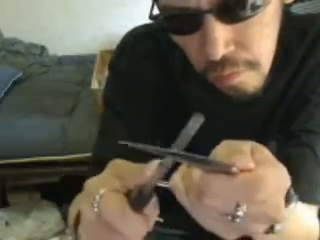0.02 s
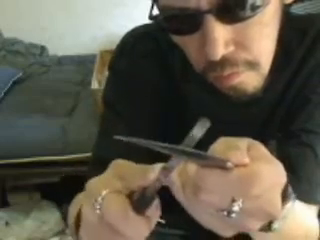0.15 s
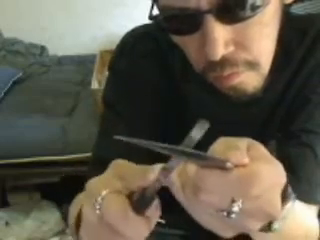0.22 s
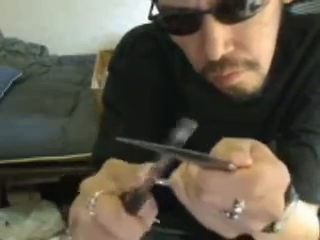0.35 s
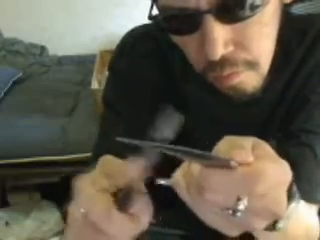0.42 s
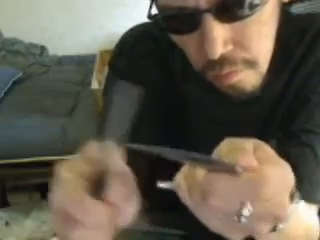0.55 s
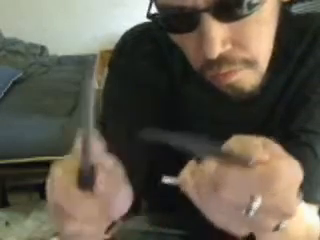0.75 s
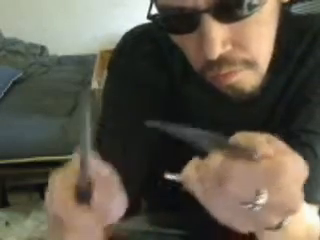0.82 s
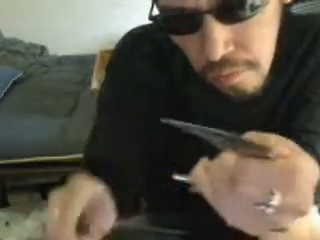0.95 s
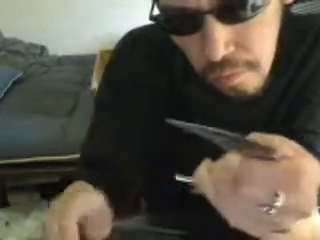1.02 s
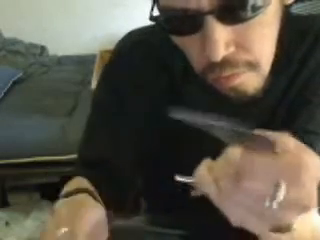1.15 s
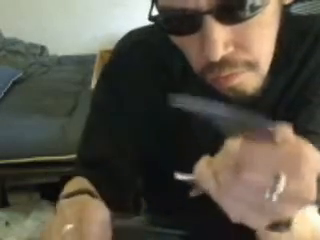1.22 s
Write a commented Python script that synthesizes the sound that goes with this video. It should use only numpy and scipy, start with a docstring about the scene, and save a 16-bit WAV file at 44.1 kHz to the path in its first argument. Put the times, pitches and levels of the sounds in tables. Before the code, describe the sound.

A sharpening steel clicks onto a knife blade and slides along it in one short, bright, ringing scrape that fades, catches and grows louder before ending. Faint hand bumps and a low hum sit beneath it in a small room.

```python
"""A click over faint room hum: a sharpening steel lands on a knife blade, skids, catches, leaves the tip.
Friction rings the steel's modes in turn as the contact slides outward. Two blade bending resonances
fall; the upper one climbs back near the tip. The stroke shakes the hands with low bumps.
Small room, narrow-band microphone."""
import sys
import numpy as np
from scipy import signal
from scipy.fft import rfft, irfft, next_fast_len
from scipy.io import wavfile
from scipy.ndimage import map_coordinates

SR = 44100
rng = np.random.default_rng(int(sys.argv[2]) if len(sys.argv) > 2 else 0)


def digitize_waveform(pressure):
    """Quantize a signal to 16-bit integers and store it at the path in sys.argv[1].

    Rows of a 2-D input are taken as channels; values are limited to [-1, 1].
    """
    field = np.atleast_2d(pressure).T
    bounded = np.clip(field, -1, 1)
    quanta = np.round(bounded * 32767).astype(np.int16)
    wavfile.write(sys.argv[1], SR, quanta)


N = 57330

# (frequency [Hz], width [Hz], struck gain [dB], rubbed gain [dB], most excited at place [0-1],
#  reach [0-1]); place 0 = heel, 1 = tip; reach 0 = struck only
STEEL_MODES = [(1154, 99, -22, -10, 0.67, 0.12), (1342, 200, -2, -12, 0.46, 0.24),
               (2868, 95, -2, -1.5, 0.7, 0.03), (3174, 120, -19, -6.5, .74, 0.2),
               (3610, 280, 3.5, 3.5, 0.9, 0.08), (4066, 210, -4.5, -3.5, .78, .13),
               (4910, 100, -15, 0, 0.5, 0), (5146, 186, 3, 4, .76, 0.07), (5580, 270, -2, -6, .77, 0),
               (6047, 290, 3.5, -0.5, .83, 0.1), (6580, 300, -1.5, -8, .3, 0.6),
               (6600, 140, -26, -6, .95, .2), (6840, 170, -9.5, 0.5, 0.96, .08),
               (7355, 240, -18, -1, 1, 0.08)]
# (time [s], relative level [dB])
FRICTION = [(.205, -100), (.212, -39), (.221, -41), (.235, -39.5), (.252, -51), (.277, -54.5), (.3, -61),
            (.325, -73), (.34, -51), (.349, -44), (.38, -56), (.408, -53), (.428, -44), (.474, -42.5),
            (.483, -33), (.508, -36.5), (.517, -33), (.525, -38.5), (.544, -42), (.574, -37.5),
            (.596, -39.5), (.603, -55), (.635, -67), (.66, -110)]
# (time [s], lower [Hz], upper [Hz], lower gain [dB], upper gain [dB])
BLADE_BENDS = [(.22, 3200, 6200, -6.5, -4.5), (.27, 3570, 5930, 3.5, 0), (.3, 3250, 5900, -9, 1),
               (.335, 3050, 5050, -7, 1.5), (.4, 2950, 4850, -18, 3), (.43, 2960, 5000, -0.5, -8),
               (.485, 2830, 4820, -3.5, -9.5), (.525, 2340, 5400, -12, 0.5), (.57, 2070, 5950, -7.5, -14),
               (.6, 1910, 6000, -18.5, -14)]
# (frequency [Hz], relative density [dB])
RASP_SPECTRUM = [(500, -31), (1000, -25), (1650, -21), (2600, -9.5), (4000, -7), (5600, -3.5), (7000, -9.5),
                 (8200, -11.5)]
# steel-on-steel blows and snags (time [s], relative level [dB])
BLOWS = [(.2179, -6), (0.2209, -16.5), (.3485, -23.5), (.3512, -25.5), (0.4826, -16.5), (.4945, -21.5),
         (.515, -22)]
# (time [s], width [s], level [dB], pitch [Hz])
EDGE_SQUEAKS = [(.349, .004, -43, 1193), (.367, 0.0054, -56, 1270)]
# (time [s], width [s], level [dB], pitch [Hz])
HAND_BUMPS = [(.481, 0.0059, -48, 108), (.508, 0.0084, -46, 124.4), (.819, 0.0041, -49, 152),
              (1.289, 0.011, -57, 132)]
# air shoved by the hands (time [s], width [s], level [dB])
AIR_PUFFS = [(.226, .007, -63), (.497, .013, -51.5), (.6, 0.037, -73.5)]
# (frequency [Hz], relative density [dB])
PUFF_SPECTRUM = [(20, -24), (45, -2), (90, -7), (200, -23.5), (500, -47)]
# (frequency [Hz], relative density [dB])
ROOM_NOISE_SPECTRUM = [(25, -50), (50, -29.5), (85, -17), (120, -5.5), (150, -6.5), (185, 0), (270, -4),
                       (400, -9), (480, -7), (600, -11.5), (950, -12), (1250, -17), (2100, -21),
                       (3000, -28), (4500, -29.5), (7000, -32.5), (8000, -40)]
# (frequency [Hz], level [dB])
HUM_TONES = [(121, -69), (264.5, -64.5), (302, -70), (341, -71.5)]

SLIDE_START_S, SLIDE_END_S = 0.25, 0.598
LOWER_WIDTH_HZ, UPPER_WIDTH_HZ = 560, 790
RASP_HEEL_GAIN_DB, RASP_RISE_DB = -8, 3.5
SLIPS_PER_S, SLIP_SPREAD_DB, CHATTER_DB, CHATTER_PER_S = 8000, 3, 1.4, 250
CONTACT_S, CRUNCH_T60_S = 0.00023, 0.0081
ROOM_T60_S, ROOM_DELAY_S, REVERB_DB, ROOM_NOISE_DB = 0.15, 0.003, -9.5, -58.5


def scrape():
    """Friction drives each mode as the contact passes its place, plus two bends and a broad rasp."""
    friction = amp(curves(FRICTION)[0])
    force = grit() * friction
    place = np.clip((clock() - SLIDE_START_S) / (SLIDE_END_S - SLIDE_START_S), 0, 1)
    ring = sum(resonate(force * amp(db) * bell(place - spot, reach), hz, width_hz)
               for hz, width_hz, _, db, spot, reach in STEEL_MODES if reach > 0)
    lower_hz, upper_hz, lower_db, upper_db = curves(BLADE_BENDS)
    bends = resonate(grit() * friction * amp(lower_db), lower_hz, LOWER_WIDTH_HZ)
    bends += resonate(grit() * friction * amp(upper_db), upper_hz, UPPER_WIDTH_HZ)
    rasp = coloured(grit() * friction * amp(RASP_HEEL_GAIN_DB + RASP_RISE_DB * place), RASP_SPECTRUM)
    return amp(-6.5) * ring + amp(-4) * bends + rasp


def grit():
    """Dense, uneven micro-slips in clumps; rms 1."""
    slips = (rng.random(N) < SLIPS_PER_S / SR) * rng.choice([-1, 1], N)
    size_db = SLIP_SPREAD_DB * rng.standard_normal(N) + CHATTER_DB * wobble(CHATTER_PER_S)
    return unit(slips * amp(size_db))


def clicks():
    """Each blow starts all modes at once, with a short crunch."""
    ring, crunch = np.zeros(N), np.zeros(N)
    for at_s, db in BLOWS:
        age_s = np.maximum(clock() - at_s, 0)
        attack = 1 - np.exp(-age_s / CONTACT_S)
        for k, (hz, width_hz, struck_db, *_) in enumerate(STEEL_MODES):
            gain = (-1) ** k * amp(db + struck_db) * np.sqrt(width_hz / 100)
            decay = np.exp(-np.pi * width_hz * age_s)
            ring += gain * attack * decay * np.sin(2 * np.pi * hz * age_s)
        crunch += amp(db - 60 * age_s / CRUNCH_T60_S) * (age_s > 0)
    return amp(-24.5) * ring + amp(-22) * coloured(crunch * rng.standard_normal(N), RASP_SPECTRUM)


def squeaks():
    """The edge catches: brief, rough, rising tones."""
    return blips(EDGE_SQUEAKS, rise_hz_per_s=23000, flutter_rad=0.26)


def hands():
    """Moving hands: dull bumps and puffs of low rumble."""
    puffs = sum(amp(db) * bell(clock() - at_s, width_s) for at_s, width_s, db in AIR_PUFFS)
    return blips(HAND_BUMPS) + puffs * unit(coloured(rng.standard_normal(N), PUFF_SPECTRUM))


def reverb(x):
    """Furnished room: short, decaying reflections."""
    time_s = clock()[:SR // 2]
    tail = rng.standard_normal(len(time_s)) * amp(-60 * time_s / ROOM_T60_S) * (time_s > ROOM_DELAY_S)
    return signal.fftconvolve(x, tail / np.linalg.norm(tail))[:N]


def background():
    """Soft room noise, wavering hum."""
    hum = np.zeros(N)
    for hz, db in HUM_TONES:
        peak = np.sqrt(2) * amp(db + 2.3 * wobble(8.7))
        hum += peak * np.sin(2 * np.pi * hz * clock() + 0.8 * wobble(10))
    return hum + amp(ROOM_NOISE_DB) * unit(coloured(rng.standard_normal(N), ROOM_NOISE_SPECTRUM))


def blips(rows, rise_hz_per_s=0, flutter_rad=0, flutter_per_s=330):
    """Tone swells of a few cycles; optional glide and flutter."""
    out = np.zeros(N)
    for at_s, width_s, db, hz in rows:
        age_s = clock() - at_s
        cycles = hz * age_s + 0.5 * rise_hz_per_s * age_s ** 2 + rng.random()
        phase_rad = 2 * np.pi * cycles + flutter_rad * wobble(flutter_per_s)
        out += np.sqrt(2) * amp(db) * bell(age_s, width_s) * np.sin(phase_rad)
    return out


def resonate(x, hz, width_hz):
    """Double-pole resonance, steady or gliding; keeps white-noise power."""
    carrier = np.exp(2j * np.pi * np.cumsum(hz + np.zeros(N)) / SR)
    pole = np.exp(-np.pi * width_hz / SR)
    gain = np.sqrt(2 * (1 - pole ** 2) ** 3 / (1 + pole ** 2))
    baseband = signal.lfilter([1], [1, -2 * pole, pole ** 2], x / carrier)
    return gain * (carrier * baseband).real


def coloured(x, spectrum):
    """Shape x by a spectrum table; keeps white-noise power."""
    knots_hz, db = np.transpose(spectrum)
    return filtered(x, lambda hz: unit(amp(np.interp(np.log(hz + 1), np.log(knots_hz), db))))


def filtered(x, response):
    """Apply the gain response(hz)."""
    size = next_fast_len(N + SR // 2)
    return irfft(rfft(x, size) * response(np.fft.rfftfreq(size, 1 / SR)), size)[:N]


def wobble(knots_per_s):
    """Smooth random curve."""
    return map_coordinates(rng.standard_normal(2000), [clock() * knots_per_s], mode="wrap")


def curves(rows):
    """Each column after time, interpolated per sample."""
    time_s, *columns = np.transpose(rows)
    return [np.interp(clock(), time_s, column) for column in columns]


def bell(offset, width):
    """Gaussian, peak 1."""
    return np.exp(-0.5 * (offset / width) ** 2)


def amp(db):
    """Decibels to gain."""
    return 10 ** (np.asarray(db) / 20)


def unit(x):
    """Scale to rms 1."""
    return x / np.sqrt(np.mean(x ** 2) + 1e-20)


def clock():
    """Sample times [s]."""
    return np.arange(N) / SR


def scene():
    """Thin steel radiates no bass; hands and room supply it."""
    steel = filtered(scrape() + clicks(), lambda hz: 1 - 1 / (1 + (hz / 950) ** 6))
    steel += squeaks()
    return (steel + amp(REVERB_DB) * reverb(steel) + hands() + background())[None]


def record(dry):
    """Narrow-band microphone: steep roll-off above 8.1 kHz."""
    knots_hz, gain_db = [8100, 8350, 9350, 9900], [0, -25, -31, -80]
    return filtered(dry[0], lambda hz: amp(np.interp(hz, knots_hz, gain_db)))[None]


dry = scene()
out = record(dry)
digitize_waveform(out)
```